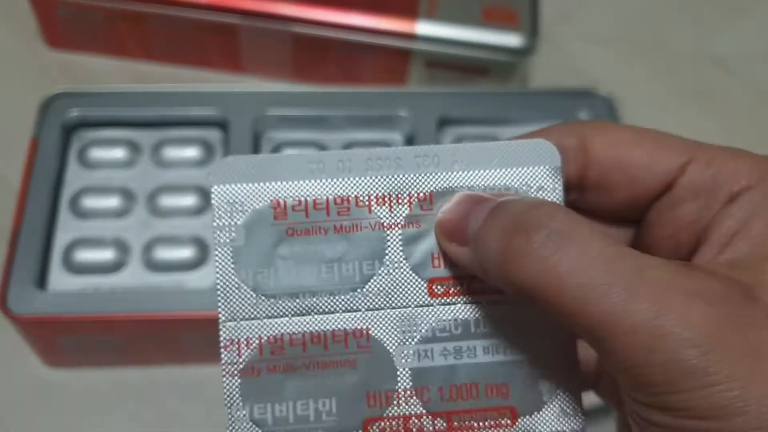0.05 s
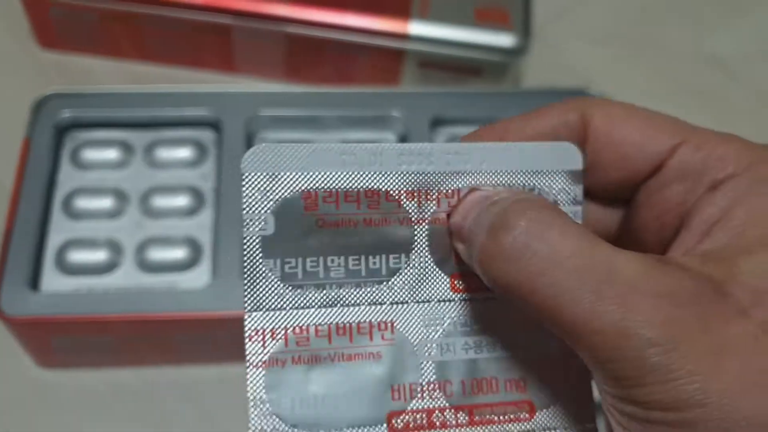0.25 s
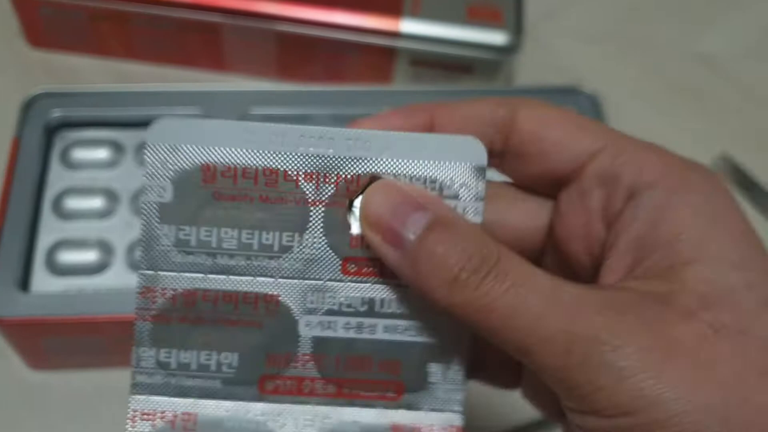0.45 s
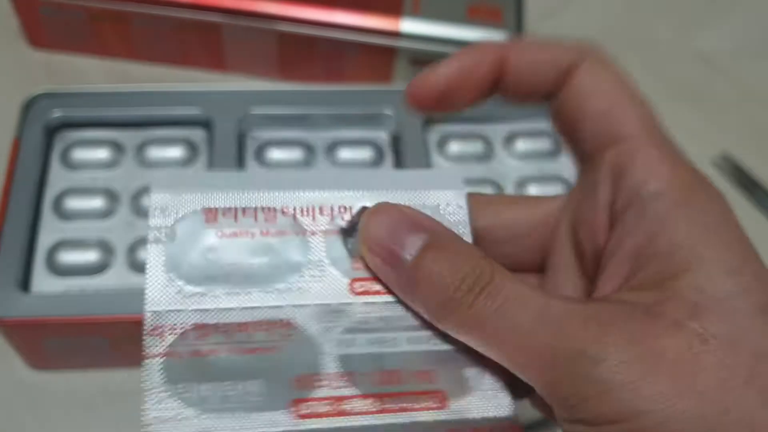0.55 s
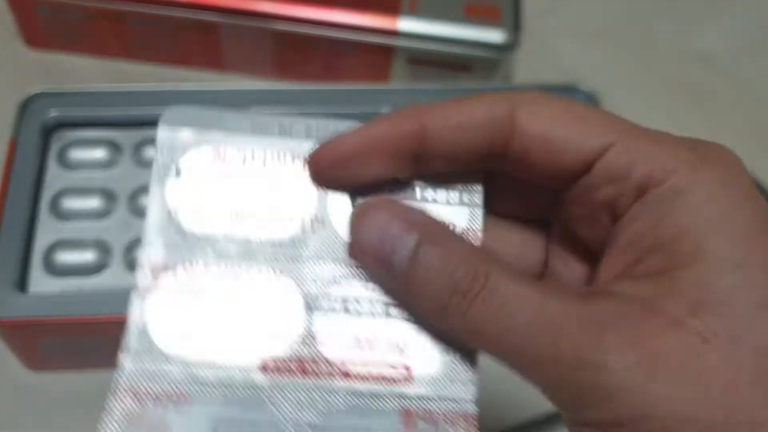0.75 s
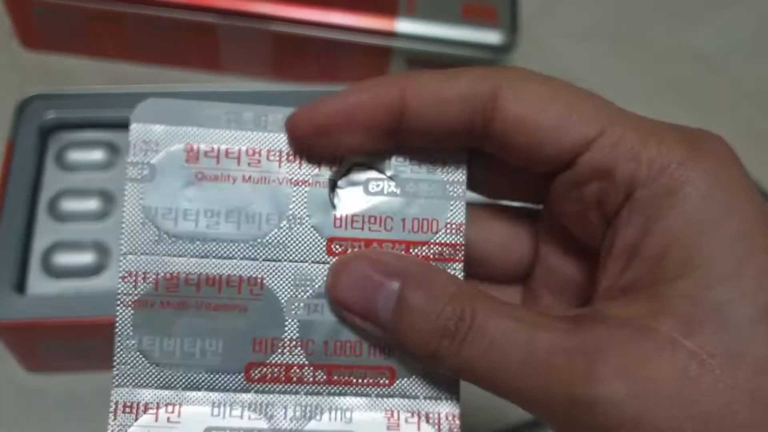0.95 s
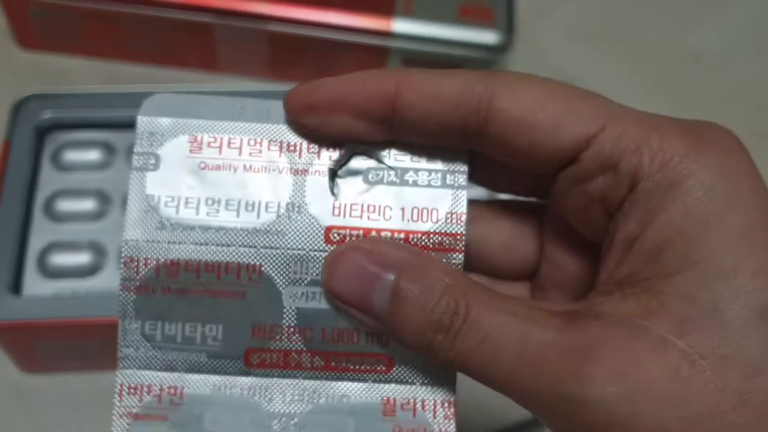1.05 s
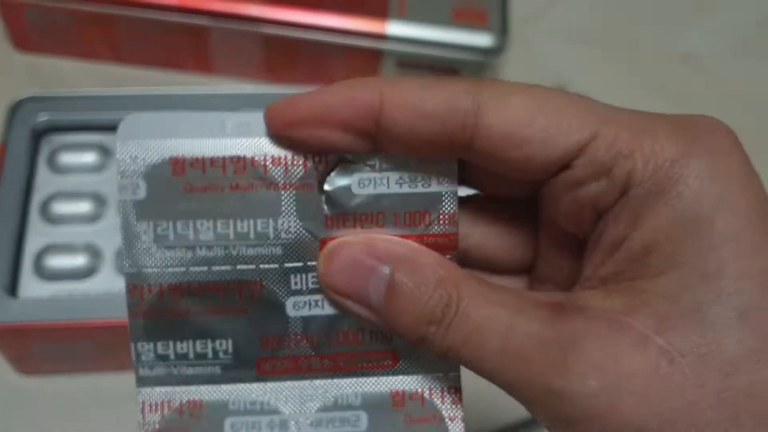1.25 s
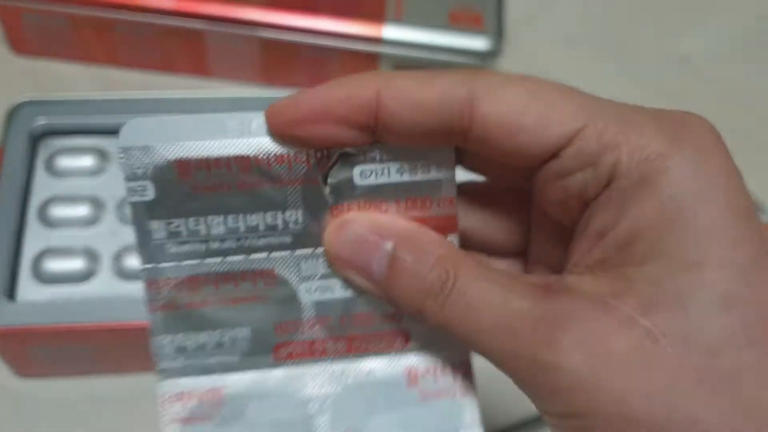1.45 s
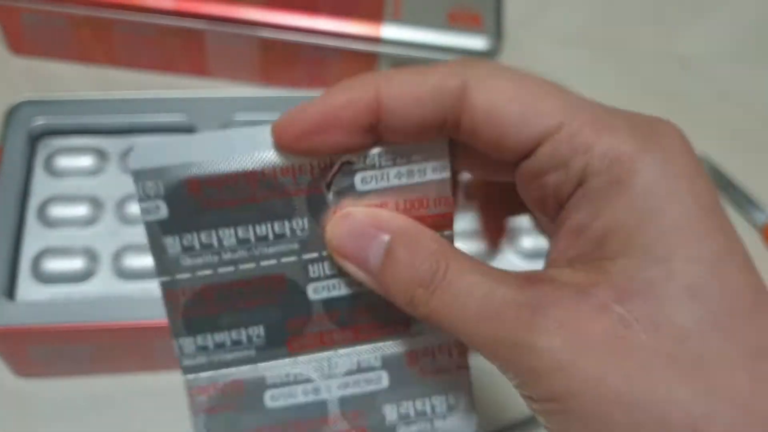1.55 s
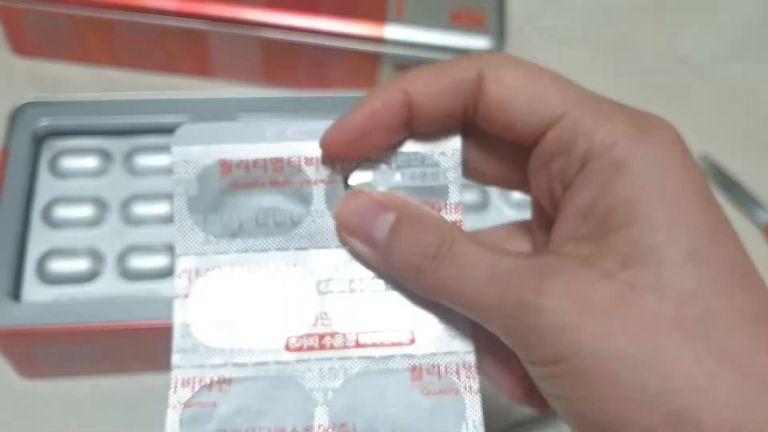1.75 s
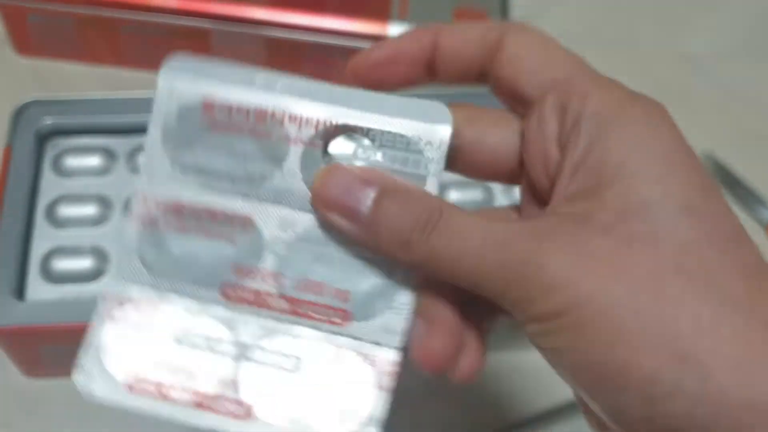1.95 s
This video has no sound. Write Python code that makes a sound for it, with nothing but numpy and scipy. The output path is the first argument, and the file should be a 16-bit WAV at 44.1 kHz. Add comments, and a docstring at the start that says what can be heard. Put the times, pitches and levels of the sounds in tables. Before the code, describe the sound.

Close, sharp crackles of a blister pack being pressed, its foil bursting once.

```python
"""A thumb pushes a tablet out of a plastic blister pack, close by on the left, in a small quiet room. First
skin slides over the foil and the pack creaks. From about 0.2 s the dome buckles in sharp snaps, and at 0.25 s
the foil bursts once in a rush of tiny cracks. After that the card creases and knocks between more snaps, each
with a short tinny repeat as a wave runs across the dome. Last, the fingers slide over the pack."""
import sys
import numpy as np
from scipy import signal
from scipy.fft import rfft, irfft
from scipy.io import wavfile

SR = 44100
rng = np.random.default_rng(int(sys.argv[2]) if len(sys.argv) > 2 else 0)


def to_wav(sig):
    """Store sig (one row per channel, or 1-D mono) as 16-bit WAV at the path in sys.argv[1].

    Samples outside -1..1 are clipped; the rate is SR.
    """
    pcm = np.clip(np.atleast_2d(sig), -1, 1) * 32767
    pcm = np.round(pcm).astype(np.int16)
    wavfile.write(sys.argv[1], SR, pcm.T)  # frames by channels


N = 88200
T = np.arange(N) / SR

# tone of the room's rumble and hiss (frequency [Hz], gain [dB])
BACKGROUND_TONE = [(25, -13), (65, -2), (130, -3), (250, -14.5), (900, -20.5), (1600, -16.5), (5000, -15.5),
                   (16000, -23)]
# tone of the room's echo (frequency [Hz], gain [dB])
ECHO_TONE = [(200, 6), (1500, 2), (7000, -4), (16000, -1.5)]
# how the far, right side is muffled (frequency [Hz], gain [dB])
FAR_TONE = [(100, -5), (400, -11), (2500, -13), (5000, -23.5), (7000, -22), (8600, -7.5), (11500, -11.5),
            (16000, -14)]
# pitches at which the pack rings (frequency [Hz], width [Hz], gain [dB])
PACK_RESONANCES = [(1372, 305, -3), (1597, 222, 5), (2362, 230, 3), (2855, 1080, 4), (3610, 240, 1.5),
                   (4790, 2900, 1.5), (6920, 510, 3)]
# the thumb slides on the foil (start [s], length [s], level [dB])
SLIDE_MOVES = [(-.02, 0.033, -44.5), (.02, 0.08, -54.5), (.785, 0.095, -52.5), (1.245, 0.065, -49.5),
               (1.68, 0.11, -44.5), (1.915, 0.23, -52.5)]
# tone of that sliding (frequency [Hz], gain [dB])
SLIDE_TONE = [(1150, -24.5), (1600, -9), (3000, -5.5), (7000, 1.5), (8600, -10), (16000, -7.5)]
# the pack creaks under pressure (start [s], length [s], level [dB])
CREAK_MOVES = [(.065, 0.061, -53.5), (.592, 0.026, -47.5), (.675, 0.073, -41.5), (.865, 0.09, -48),
               (1.575, 0.036, -44), (1.8, 0.03, -56.5)]
# tone of that creaking (frequency [Hz], gain [dB])
CREAK_TONE = [(120, -22.5), (800, 6), (1500, 3.5), (5000, -0.5), (8000, -11.5), (16000, -1)]
# the hand shifts its grip with a soft thud (start [s], length [s], level [dB])
GRIP_MOVES = [(1.35, 0.092, -67.5), (1.595, .03, -71)]
# the card pops with a hollow knock (time [s], level [dB])
CARD_KNOCKS = [(0.5782, -44.5), (0.7534, -40), (1.3625, -47), (1.565, -43.5), (1.601, -46)]
# dull creases of foil and card; each band's gain is added to its level later
# (time [s], fade time [s], bass [dB], middle [dB], treble [dB])
CARD_CREASES = [(0.157, 0.13, -70, -47, -53.5), (0.2358, 0.27, -49, -30, -43.5),
                (0.3521, 0.017, -51.5, -40.5, -56), (0.464, 0.15, -60, -44.5, -56),
                (0.578, 0.036, -62, -41.5, -48.5), (0.6233, 0.076, -59, -41.5, -39.5),
                (0.6472, 0.091, -48, -32.5, -39.5), (0.6567, 0.059, -44.5, -30, -46),
                (0.6655, 0.044, -39, -25.5, -31.5), (0.7428, 0.025, -40, -33.5, -53),
                (0.7536, 0.032, -41.5, -29.5, -35.5), (0.8679, 0.038, -49.5, -43.5, -65),
                (0.9313, 0.15, -53, -36.5, -44.5), (0.942, 0.028, -44, -34.5, -50),
                (0.9871, 0.046, -44, -30.5, -44), (1.001, 0.044, -47.5, -34, -42),
                (1.1084, 0.034, -77, -41.5, -45), (1.3893, 0.049, -53, -40, -49.5),
                (1.6482, 0.063, -64, -40.5, -43), (1.6849, 0.055, -51.5, -37.5, -48),
                (1.759, 0.04, -61.5, -39.5, -51), (1.8991, 0.09, -80, -44, -47)]
# tone of the tearing foil (frequency [Hz], gain [dB])
BURST_TONE = [(90, -34), (200, -21.5), (634, -11), (1010, -14), (1390, -5), (3250, -0.5), (6020, 2),
              (16000, -19)]
# snaps of the buckling dome; each band's gain is added to its level later
# (time [s], fade time [s], pitch [Hz], body [dB], ring [dB], fizz [dB])
DOME_SNAPS = [(0.214, 0.037, 7360, -55.5, -51.5, -67), (0.2401, 0.027, 5260, -34, -22.5, -29),
              (0.259, 0.014, 7500, -34, -22, -21.5), (0.2648, 0.028, 6200, -40, -23.5, -22.5),
              (0.415, 0.03, 7210, -42, -24, -29), (0.4337, 0.016, 4130, -50, -34, -37.5),
              (0.4374, 0.072, 4530, -46.5, -35.5, -46.5), (0.636, 0.045, 4950, -39.5, -30, -40.5),
              (1.0308, 0.048, 4080, -36.5, -37, -51), (1.0548, 0.015, 3670, -35, -34, -40),
              (1.119, 0.031, 5270, -38.5, -28, -26.5), (1.184, 0.03, 6420, -56, -26.5, -38.5),
              (1.2136, 0.039, 4500, -38.5, -45, -51), (1.2258, 0.026, 6180, -37, -28, -21.5),
              (1.2809, 0.026, 5470, -30.5, -30, -37), (1.2995, 0.019, 4530, -38.5, -34, -39.5),
              (1.3626, 0.036, 6310, -36.5, -20.5, -28), (1.3704, 0.052, 5900, -30.5, -27.5, -33),
              (1.5154, 0.034, 4470, -62.5, -57.5, -64.5), (1.564, 0.011, 5800, -36, -34, -45),
              (1.571, 0.019, 6960, -47, -34.5, -41.5), (1.6031, 0.042, 6840, -41.5, -37, -49),
              (1.6739, 0.015, 7740, -53, -33, -39), (1.7036, 0.01, 5490, -35, -27.5, -35),
              (1.7331, 0.011, 7300, -44.5, -22.5, -34), (1.7862, 0.03, 5040, -45.5, -52, -56)]


def undb(db):
    """Turn decibels into a gain to multiply by."""
    return 10 ** (np.asarray(db) / 20)


def unit(x):
    """Scale a sound to an average (rms) level of 1."""
    return x / np.sqrt(np.mean(x ** 2) + 1e-20)


def hit(x, db):
    """Give a short sound the energy of 10 ms at this level."""
    return x * undb(db) * np.sqrt(SR / 100 / (np.sum(x ** 2) + 1e-20))


def colour(x, points, size=2048):
    """Shape the tone along a curve of (frequency [Hz], gain [dB]) points."""
    hz, db = np.array(points, float).T
    grid_hz = np.arange(size // 2 + 1) * SR / size
    gain = undb(np.interp(np.log(grid_hz + 1), np.log(hz), db))
    cepstrum = irfft(np.log(gain))
    cepstrum[1:size // 2] *= 2  # folded forward, so the filter never rings ahead of a sound
    cepstrum[size // 2 + 1:] = 0
    return signal.fftconvolve(x, irfft(np.exp(rfft(cepstrum))))[:len(x)]


def band(x, lo_hz, hi_hz, order=3):
    """Keep what lies between two frequencies."""
    return signal.sosfilt(signal.butter(order, [lo_hz, hi_hz], "band", fs=SR, output="sos"), x)


def fade(t, fade_s):
    """Die away by 60 dB over the fade time."""
    return np.exp(-np.log(1000) * np.maximum(t, 0) / fade_s)


def add(out, start, x):
    """Mix a stereo sound in at a start time in seconds."""
    i = int(start * SR)
    out[:, i:i + x.shape[1]] += x[:, :N - i]


def strokes(moves, edge_s):
    """Loudness of movements that swell, hold and let go."""
    return sum(undb(db) * np.clip(np.minimum(T - start, start + length - T) / edge_s + .5, 0, 1)
               for start, length, db in moves)


def crackle(count, per_s, spread_db):
    """Tiny cracks at random moments; more spread makes a few stand out."""
    cracked = rng.random(count) < per_s / SR
    size = np.minimum(rng.exponential(size=count), 4)
    sign = rng.choice([-1, 1], count)
    return unit(cracked * sign * undb(spread_db * size))


def room_tone(level_db=-67):
    """Faint rumble and hiss, partly shared by both sides."""
    shared, left, right = (unit(colour(rng.standard_normal(N), BACKGROUND_TONE)) for _ in range(3))
    return undb(level_db) * np.array([shared + 0.17 * left, 0.3 * shared + 0.44 * right])


def room_echo(x, gap_s=0.0044):
    """Sound bounces off the hand and table, then dies away in the small room."""
    t = T[:N // 3]
    early = unit(rng.standard_normal(len(t)) * fade(t, fade_s=0.11) * (t > gap_s))
    late = unit(rng.standard_normal(len(t)) * fade(t, fade_s=0.26) * (t > gap_s))
    echo = (undb(-19) * early + undb(-17) * late) / np.sqrt(len(t))
    return signal.fftconvolve(x, colour(echo, ECHO_TONE))[:N]


def both_sides(near, lag_s=0.00012, scatter_db=1):
    """The left hears the pack directly; the right hears it later, muffled and scattered round the hand."""
    t = T[:N // 200]
    scatter = unit(rng.standard_normal(len(t)) * fade(t, fade_s=.012))
    detour = band(scatter, 2200, 18000) / np.sqrt(len(t))
    scattered = near + undb(scatter_db) * signal.fftconvolve(near, detour)[:len(near)]
    times = T[:len(near)]
    far = np.interp(times - lag_s, times, colour(scattered, FAR_TONE))
    return np.array([near, far])


def pack(x, bypass_db=-25.5):
    """The card and foil ring at their own pitches; a little sound passes unchanged."""
    ringing = sum(undb(db) * signal.lfilter(*signal.iirpeak(hz, hz / width, SR), x)
                  for hz, width, db in PACK_RESONANCES)
    return undb(bypass_db) * x + ringing


def fingers():
    """Skin hisses over the foil, the strained pack creaks softly and the grip thuds."""
    friction = crackle(N, per_s=9000, spread_db=1)
    slide = unit(colour(friction, SLIDE_TONE)) * strokes(SLIDE_MOVES, edge_s=0.016)
    strain = crackle(N, per_s=3000, spread_db=2)
    creak = unit(colour(pack(strain), CREAK_TONE)) * strokes(CREAK_MOVES, edge_s=0.0072)
    rumble = band(rng.standard_normal(N), 43.4, 152, order=2)
    thud = unit(rumble) * strokes(GRIP_MOVES, edge_s=0.016)
    return both_sides(slide + creak + thud)


def knocks(hz=1620):
    """The whole card pops over and rings briefly at its hollow note."""
    out, t = np.zeros((2, N)), T[:N // 20]
    note = band(fade(t, fade_s=.035) * np.sin(2 * np.pi * hz * t), hz / 2, 2 * hz)
    for start, db in CARD_KNOCKS:
        add(out, start, both_sides(hit(note, db)))
    return out


def creases(rise_s=0.0005, bass_gain_db=-4, middle_gain_db=-1.5, treble_gain_db=5):
    """A fold runs through the card as a short string of tiny cracks."""
    out, t = np.zeros((2, N)), T[:N // 12]
    for start, fade_s, bass_db, middle_db, treble_db in CARD_CREASES:
        shape = np.minimum(t / rise_s, 1) * fade(t, fade_s)
        fold = pack(shape * crackle(len(t), per_s=6000, spread_db=1.5))
        soft_top = colour(band(fold, 3860, 15300), [(6000, 0.0), (9000, -13.5)])
        bass = hit(band(fold, 232, 932), bass_db + bass_gain_db)
        middle = hit(band(fold, 1260, 3610), middle_db + middle_gain_db)
        treble = hit(soft_top, treble_db + treble_gain_db)
        add(out, start, both_sides(bass + middle + treble))
    return out


def foil_burst(start_s=0.2534, rise_s=0.014, hold_s=0.012, rip_db=-19.5):
    """The tablet tears the foil along three rips at once: a dense rush of cracks that dies away."""
    t = T - start_s
    shape = np.clip(t / rise_s, 0, 1) * fade(t - rise_s - hold_s, fade_s=0.11)
    rips = (unit(colour(crackle(N, per_s=4000, spread_db=0), BURST_TONE)) for _ in range(3))
    return undb(rip_db) * shape * sum(both_sides(rip) for rip in rips)


def dome_bounce(x, trip_s, returning_share=.25):
    """A bending wave runs across the dome and back again and again, which sounds tinny."""
    loop = np.zeros(int(trip_s * SR) + 1)
    loop[0], loop[-1] = 1, -returning_share
    return signal.lfilter([1], loop, x)


def dome_snaps(rise_s=.00025, crack_s=.0007, flip_s=0.00058,
               body_gain_db=-3, ring_gain_db=2, fizz_gain_db=2):
    """The dome flips: a hard crack with a blip of its own note, then a quickly dying rattle of the foil."""
    out, t = np.zeros((2, N)), T[:N // 20]
    for start, fade_s, hz, body_db, ring_db, fizz_db in DOME_SNAPS:
        shape = np.minimum(t / rise_s, 1) * fade(t, fade_s) * (1 + np.exp(-t / crack_s))
        cracks = crackle(len(t), per_s=21000, spread_db=4)
        trip_s = .0011 * 2 ** (rng.random() - .5)
        rattle = pack(dome_bounce(shape * cracks, trip_s))
        note = t * np.exp(-t / flip_s) * np.sin(2 * np.pi * hz * t)  # loudest at flip_s
        rattle_near_note = band(rattle, 0.66 * hz, 7900)
        blend = hit(rattle_near_note, 0) + hit(note, 0)  # equal energy from each
        body = hit(band(rattle, 1566, 3440, order=4), body_db + body_gain_db)
        ring = hit(band(blend, 3960, 10800), ring_db + ring_gain_db)
        fizz = hit(band(rattle, 10260, 15850), fizz_db + fizz_gain_db)
        add(out, start, both_sides(body + ring + fizz))
    return out


def scene():
    """The pack close by, the room's echo (weaker on the right) and the faint background."""
    direct = dome_snaps() + creases() + knocks() + foil_burst() + fingers()
    echo = np.array([room_echo(direct[0]), undb(-12) * room_echo(direct[0])])
    return direct + echo + room_tone()


def record(dry, top_hz=15850):
    """Clip peaks at full scale and cut the very highest treble."""
    return signal.sosfilt(signal.ellip(10, .2, 100, top_hz, fs=SR, output="sos"), np.clip(dry, -1, 1))


dry = scene()
out = record(dry)
to_wav(out)
```